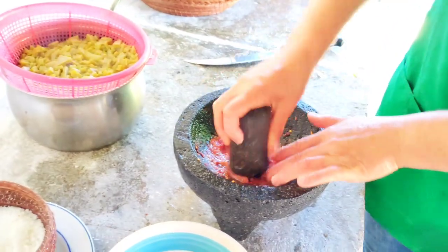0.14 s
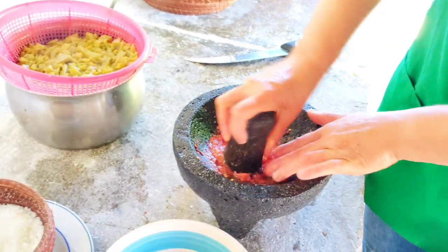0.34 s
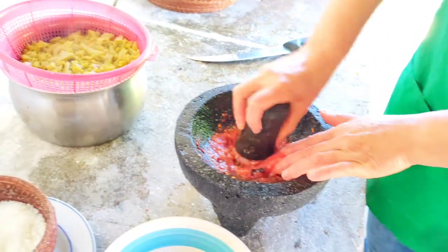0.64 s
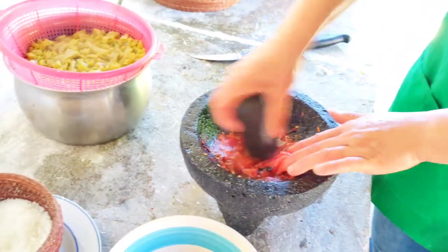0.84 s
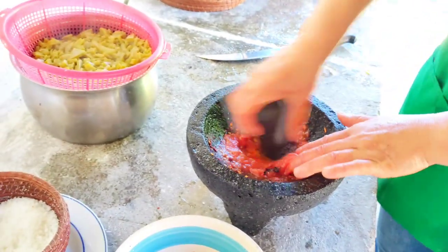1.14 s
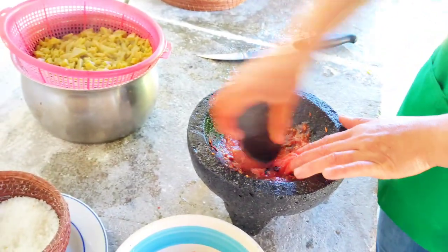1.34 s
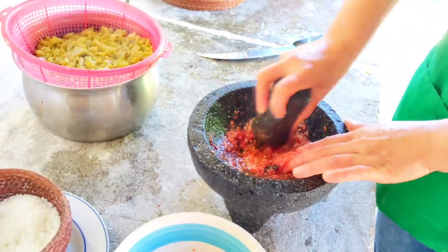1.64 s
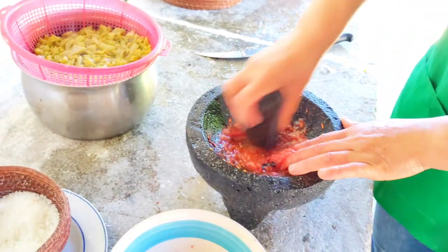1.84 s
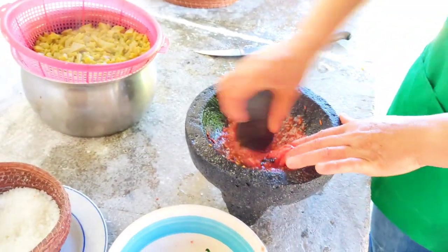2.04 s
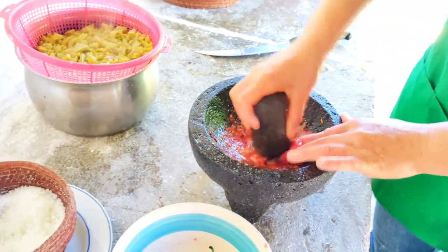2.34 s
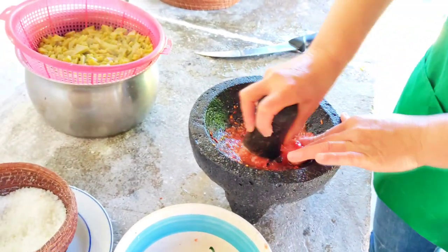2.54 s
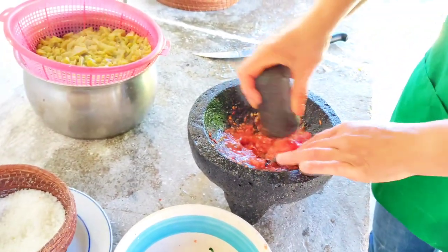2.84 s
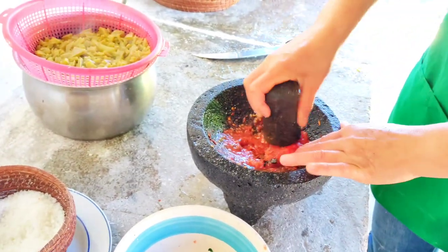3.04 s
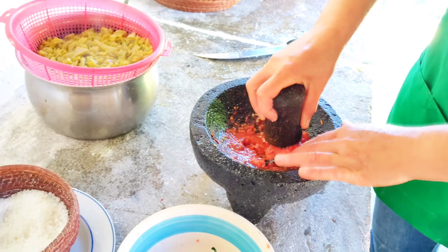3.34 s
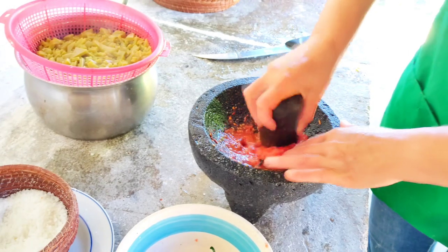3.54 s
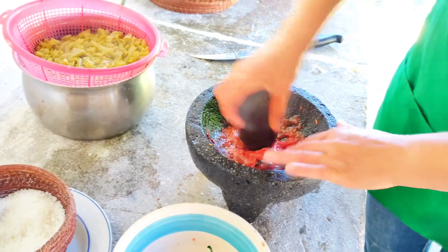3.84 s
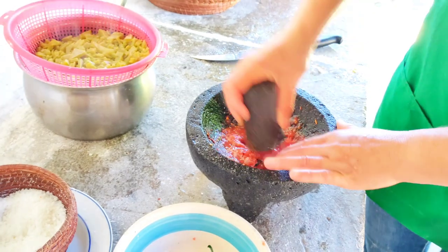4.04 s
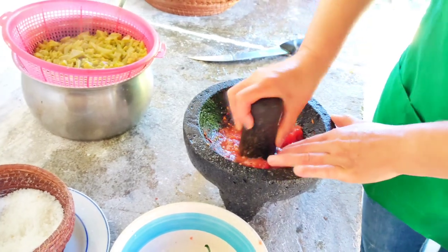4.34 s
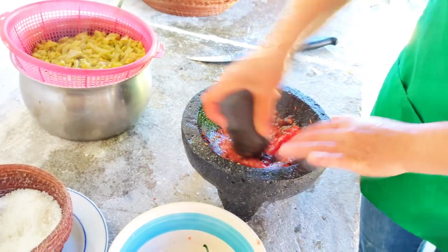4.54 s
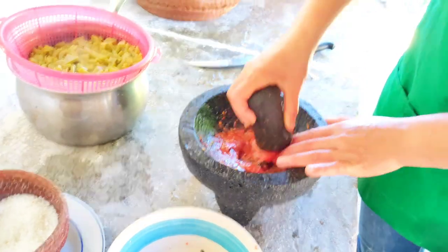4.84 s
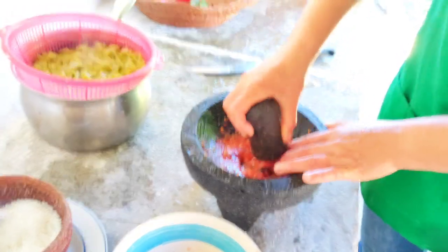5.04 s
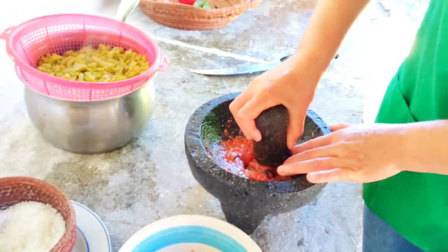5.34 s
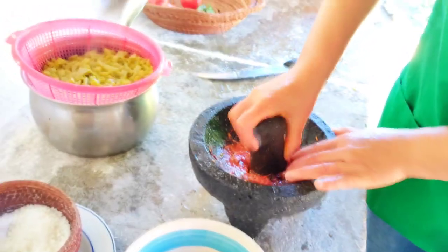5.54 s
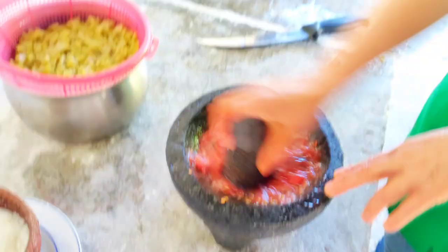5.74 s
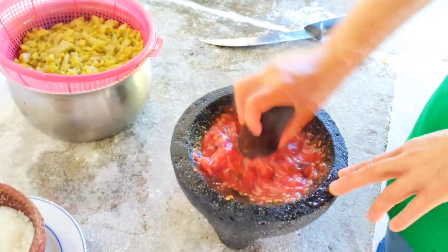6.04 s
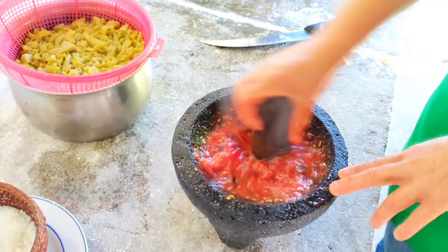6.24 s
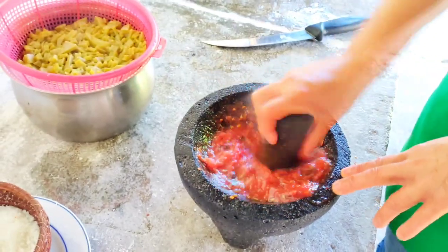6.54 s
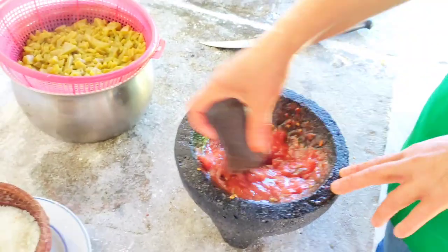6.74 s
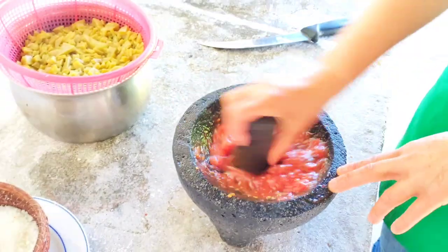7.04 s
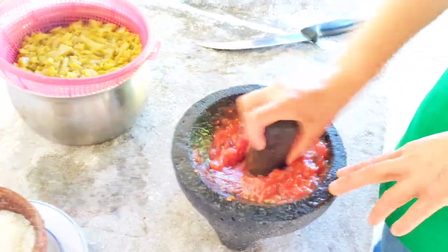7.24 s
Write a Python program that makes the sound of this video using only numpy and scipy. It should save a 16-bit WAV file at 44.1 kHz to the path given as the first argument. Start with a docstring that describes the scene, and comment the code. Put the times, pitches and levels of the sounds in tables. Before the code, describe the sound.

A stone pestle mashes wet tomatoes in a stone mortar in two bouts of thuds, knocks, grating and squirts.

```python
"""A stone pestle mashes tomatoes in a stone mortar, close and in stereo, over quiet open-air ambience.
Soft squelches lead into a first bout (0.7-2.1 s): blows thud through the pulp into the counter, stone
knocks and grates on the rough bowl, skins burst and squirt, and the pulp sucks back with a slurp.
Then the pestle mostly presses and turns, with a wet crackle, stray squirts and the odd knock.
A second bout in thin pulp (5.7-7.4 s) brings the hardest knock, squeaks on bare stone and last squirts."""
import sys
import numpy as np
from scipy import signal
from scipy.io import wavfile

SR = 44100
rng = np.random.default_rng(int(sys.argv[2]) if len(sys.argv) > 2 else 0)


def transcribe(signal):
    """Save signal, clipped to [-1, 1], as a 16-bit WAV file at the path in sys.argv[1]."""
    frames = np.atleast_2d(signal).T
    limited = np.clip(frames, -1, 1)
    pcm = np.round(limited * 32767).astype(np.int16)
    wavfile.write(sys.argv[1], SR, pcm)


N = 325458
TIME = np.arange(N) / SR
RING_TIME = TIME[:SR // 2]

# outdoor bed: f/Hz, spectral level/dB
AIR_COLOUR = [(25, 0), (108, -6), (1100, -16), (1650, -14), (3250, -22.5), (6050, -28), (11300, -34),
              (14800, -25.5)]
# stereo image of the noises: f/Hz, left-right correlation
STEREO_LIKENESS = [(30, 0.4), (100, 0.92), (420, 0.55), (1800, 0.064), (14000, 0.045)]
# decay of the kitchen shelter's reflections: f/Hz, t60/s
SHELTER_DECAY = [(100, 0.28), (3000, 0.26), (14000, 0.019)]
# rumble of the wobbling mortar: f/Hz, spectral level/dB
ROCKING_COLOUR = [(50, -40), (80, -2.5), (108, 0), (140, -4.5), (200, -14.5), (300, -24.5), (1000, -57)]
# bright scatter off the bowl's wall, for splashes and the crack of a knock: f/Hz, spectral level/dB
WALL_COLOUR = [(800, 9.5), (2500, -0.5), (4500, -3.5), (8500, -7.5), (11500, -9), (14500, -2.5)]
# dense upper resonances of the stone: f/Hz, spectral level/dB
STONE_TIMBRE = [(400, 4.5), (620, -4.5), (950, 2), (1450, -6), (1900, -14), (3000, -11.5), (3800, -20),
                (6000, -16), (10000, -22), (14000, -43)]
# modes of the mortar on the counter: f/Hz, level/dB, t60/s
COUNTER_RING = [(108.9, -2, 0.31), (148, -4, 0.1), (172.5, -4, 0.087), (262, -12, 0.12), (344, -6, 0.071),
                (415.4, -7.5, 0.26), (467, -8.5, 0.11), (553, -22.5, 0.12)]
# modes of the stone bowl and the air in it: f/Hz, level/dB, t60/s
BOWL_RING = [(756.6, -21, 0.11), (825, -20.5, 0.078), (907.5, -9, 0.061), (1019, -9, 0.037),
             (1120, -9, 0.035), (1343, -0.5, 0.014), (1603, -5.5, 0.013), (1974, -5.5, 0.0085),
             (2566, -7.5, 0.0078)]
# the bowl's hollow note and the pestle's high ring after a free bounce: f/Hz, level/dB, t60/s
FREE_RING = [(991, -5, .05), (2985, 0, .022)]

# steady mashing, in fresh fruit and then in thin pulp: start/s, end/s, rocking/dB, crackle/dB
MASHING_BOUTS = [(0.694, 2.135, -45.5, -58), (5.732, 7.38, -48.5, -74.5)]
# soft flesh gives way in a swell of crackle: t/s at the crest, level/dB
FLESH_SQUELCHES = [(0.256, -52), (0.487, -50.5), (1.076, -49), (1.227, -44), (1.632, -40), (2.306, -59),
                   (2.709, -55), (2.955, -58), (4.335, -52)]
# skins burst and juice squirts: t/s, level/dB, f/Hz, skin snap against the pops/dB
JUICE_SQUIRTS = [(0.793, -25.5, 6460, -4), (0.8088, -36.5, 8800, 8), (0.9486, -39.5, 5800, 14),
                 (1.003, -45, 6000, 11), (1.036, -41.5, 6600, 11), (1.104, -24, 5500, 0.5),
                 (1.378, -18, 4600, -29), (1.6558, -21, 5900, -2), (1.814, -27.5, 4950, -3.5),
                 (1.9712, -33, 6340, 10.5), (2.069, -24.5, 4120, -10), (2.644, -39.5, 5430, -21),
                 (3.4472, -43, 5070, -8), (3.605, -23.5, 4250, -2), (3.87, -36, 4270, -14),
                 (3.947, -47, 7760, 13), (4.1619, -38, 5800, -16), (4.5654, -32.5, 4450, -25),
                 (5.067, -41, 3700, 2.5), (5.451, -45.5, 5270, -16), (6.975, -32.5, 8400, -7),
                 (7.0097, -27.5, 3900, -8), (7.078, -27, 6700, 8), (7.276, -24, 3900, -11),
                 (7.326, -30.5, 5950, -5)]
# the pestle skids on bare stone: start/s, end/s, level/dB, f/Hz
STONE_SKIDS = [(6.028, 6.125, -56, 3000), (6.152, 6.153, -42.5, 5810), (6.894, 6.954, -57, 3170)]
# the pestle drags over the bowl: start/s, end/s, grating/dB, counter drone/dB
DRAGS = [(1.022, 1.112, -44, -37.5), (1.297, 1.364, -43, -43), (1.519, 1.711, -49.5, -37.5),
         (1.736, 1.83, -41, -33.5), (2.028, 2.119, -35.5, -27), (5.587, 5.651, -48.5, -64),
         (5.699, 5.819, -44, -39.5), (6.058, 6.176, -40.5, -36), (6.227, 6.259, -38, -32),
         (6.349, 6.453, -41.5, -35.5), (6.614, 6.697, -52, -42.5), (6.876, 6.976, -44, -34),
         (7.213, 7.271, -41.5, -37.5), (7.301, 7.414, -41.5, -40.5)]
# the weight of a blow reaches the counter: t/s, level/dB, contact hardness/Hz
COUNTER_THUDS = [(0.634, -27, 190), (0.838, -16, 191), (0.957, -22.5, 186), (1.239, -25, 199),
                 (1.532, -14.5, 605), (1.783, -25, 500), (1.863, -13, 196), (1.922, -14.5, 500),
                 (2.425, -27, 163), (3.619, -13, 248), (4.330, -32, 133), (5.624, -33, 168),
                 (5.788, -23, 128), (5.999, -17.5, 490), (6.872, -19.5, 398), (7.101, -16, 218)]
# the pestle bounces free after the hardest blows: t/s, level/dB
FREE_BOUNCES = [(1.529, -23.5), (6.003, -19.5)]
# stone meets stone: t/s, level/dB, contact hardness/Hz, f/Hz favoured by the struck spot
STONE_KNOCKS = [(0.949, -41, 4000, 1660), (1.319, -36.5, 1190, 1330), (1.528, -13.5, 2050, 830),
                (1.765, -27, 1270, 880), (1.926, -30, 1120, 880), (2.035, -32.5, 1500, 1300),
                (2.410, -41, 4700, 1650), (3.6059, -24.5, 5130, 1560), (3.948, -52, 6000, 1410),
                (5.748, -32, 650, 764), (5.996, -8.5, 2500, 946), (6.146, -26, 1816, 1000),
                (6.228, -34.5, 1300, 1100), (6.308, -32, 1300, 1380), (6.374, -25, 930, 905),
                (6.398, -25, 1010, 950), (6.414, -27, 1210, 1050), (6.528, -35.5, 1300, 1240),
                (6.8675, -18.5, 935, 1130), (6.980, -21, 830, 1120), (7.0956, -22, 930, 1260),
                (7.230, -27, 899, 930)]

BOUT_RISE_S, BOUT_FALL_S = 0.12, 0.019   # time constants of leaning in and letting go


def from_db(db):
    """Decibels to gain."""
    return 10 ** (np.asarray(db) / 20)


def rms_one(x):
    """Scale to rms 1."""
    return x / np.sqrt(np.mean(x ** 2) + 1e-20)


def unit_energy(response):
    """Scale an impulse response so that it passes power unchanged."""
    return rms_one(response) / np.sqrt(response.shape[-1])


def at_hz(points, hz):
    """Read a table on a log-frequency axis."""
    freqs, values = np.array(points).T
    return np.interp(np.log(hz), np.log(freqs), values)


def butter(x, hz, kind, order=2):
    """Causal Butterworth filter."""
    sos = signal.butter(order, np.clip(hz, 10, .45 * SR), kind, fs=SR, output="sos")
    return signal.sosfilt(sos, x + 1e-18)


def resonance(x, hz, width_hz):
    """Two-pole band-pass with gain 1 at its peak."""
    r = np.exp(-np.pi * width_hz / SR)
    feedback = [1, -2 * r * np.cos(2 * np.pi * hz / SR), r * r]
    return signal.lfilter(np.array([1, 0, -1]) * (1 - r * r) / 2, feedback, x + 1e-18)


def add(track, s, sound):
    """Mix a sound into a track at time s."""
    i = int(np.clip(round(s * SR), 0, N - 1))
    track[..., i:i + sound.shape[-1]] += sound[..., :N - i]


def through(force, response):
    """Play a force through a stereo impulse response."""
    return signal.fftconvolve(np.atleast_2d(force), response, axes=-1)[:, :N]


def swell(start, end, rise_s, fall_s):
    """An envelope that grows to 1 at start, holds until end and dies away."""
    return np.exp(np.minimum(TIME - start, 0) / rise_s - np.maximum(TIME - end, 0) / fall_s)


def tail(s, t60):
    """An envelope that jumps to 1 at time s and dies away."""
    return (TIME >= s) * np.exp(-np.log(1000) * np.maximum(TIME - s, 0) / t60)


def together(gains):
    """Joint gain of unrelated causes: their powers add."""
    return np.sqrt(sum(gain ** 2 for gain in gains))


def noise(colour, t, t60=None):
    """Stereo noise in third-octave bands, rms 1 overall; with a t60 table each band dies away."""
    out, edges = 0, np.geomspace(22, 17000, 29)
    white = rng.standard_normal((2, 2, len(t)))
    for k, band in enumerate(zip(edges, edges[1:])):
        hz = np.sqrt(np.prod(band))
        mid, side = butter(white[k % 2], band, "band")
        alike = at_hz(STEREO_LIKENESS, hz)
        stereo = np.sqrt(1 + alike) * mid + np.sqrt(1 - alike) * side * [[1], [-1]]
        fade = from_db(-60 * t / at_hz(t60, hz)) if t60 else 1
        out = out + from_db(at_hz(colour, hz)) * fade * stereo
    return rms_one(out)


def grains(per_s, spread_db, size=N):
    """Random clicks, most near height 1, a few louder (or softer, with a negative spread)."""
    heights = from_db(spread_db * np.minimum(rng.exponential(1, size), 4))
    return (rng.random(size) < per_s / SR) * heights * rng.choice([-1, 1], size)


def modal(modes, polarity=1):
    """A ring of decaying modes, the higher wider in stereo; negative polarity flips every other one."""
    out = 0
    for k, (hz, db, t60) in enumerate(modes):
        skew = np.arctan(hz / 1900) / 2 * np.array([[1], [-1]])
        decay = np.exp(-np.log(1000) * RING_TIME / t60)
        out = out + polarity ** k * from_db(db) * decay * np.sin(2 * np.pi * hz * RING_TIME + skew)
    return out


def contact(hardness_hz, pitch_hz):
    """Force pulse of a blow, shorter when harder, with gain 1 at pitch_hz."""
    age = 2 * np.pi * hardness_hz * RING_TIME[:SR // 20]
    pulse = age * np.exp(-age)
    return pulse / pulse.sum() * (1 + (pitch_hz / hardness_hz) ** 2)


def outdoor_air():
    """A quiet, steady bed of low rumble and hiss."""
    return from_db(-60) * noise(AIR_COLOUR, TIME)


def stone_responses():
    """Impulse responses of bowl, counter and a free bounce: modes, then the shelter's reflections."""
    arrival = 1 - np.exp(-RING_TIME / .004)
    crack = noise(WALL_COLOUR, RING_TIME) * np.exp(-RING_TIME / 0.0011)
    scatter = arrival * noise(STONE_TIMBRE, RING_TIME, SHELTER_DECAY)
    scatter *= from_db(-1.5) * np.exp(-RING_TIME / 0.0021) + from_db(-29.5)   # early burst, faint tail
    bowl = modal(BOWL_RING, polarity=-0.99) + from_db(-2.5) * crack + scatter
    reflections = noise([(60, -8.5), (600, -9.5)], RING_TIME, SHELTER_DECAY)
    boom = arrival * butter(reflections, hz=580, kind="low", order=4)
    counter = from_db(-4) * modal(COUNTER_RING) + from_db(-15) * boom
    ring = modal(FREE_RING)
    echo = unit_energy(arrival * noise(STONE_TIMBRE, RING_TIME, SHELTER_DECAY))
    free_ring = from_db(5) * ring + from_db(-6.5) * through(ring, echo)[:, :len(RING_TIME)]
    return bowl, counter, free_ring


def rocking(idle_db=-56.5, wobble_t60=0.75):
    """The mortar rumbles on the counter while the hand works, and wobbles on after thuds and drags."""
    causes = [from_db(idle_db)]   # the pestle only presses and turns
    causes += [from_db(db) * swell(start, end, BOUT_RISE_S, BOUT_FALL_S)
               for start, end, db, _ in MASHING_BOUTS]
    causes += [from_db(db - 19.5) * tail(s, wobble_t60) for s, db, _ in COUNTER_THUDS]
    causes += [from_db(db - 3) * tail((start + end) / 2, wobble_t60) for start, end, _, db in DRAGS]
    return together(causes) * noise(ROCKING_COLOUR, TIME)


def crackle(idle_db=-67.5):
    """Pulp fizzes under the pestle, swells in bouts and squelches, and settles after each squirt."""
    work = [from_db(idle_db)]
    work += [from_db(db) * swell(start, end, BOUT_RISE_S, BOUT_FALL_S)
             for start, end, _, db in MASHING_BOUTS]
    spurts = [from_db(db) * swell(s, s, rise_s=0.016, fall_s=0.005) for s, db in FLESH_SQUELCHES]
    spurts += [from_db(db - 17.5) * tail(s, t60=0.049) for s, db, _, _ in JUICE_SQUIRTS]
    fizz = rms_one(grains(per_s=2200, spread_db=7))
    steady = rms_one(resonance(fizz, hz=6420, width_hz=7200))
    bright = from_db(5.5) * butter(fizz, hz=3460, kind="high", order=1)
    return together(work) * steady + together(spurts) * bright


def slurp(s=2.122, db=-49.5, top_hz=3600, sag_hz_per_s=25000, spread_hz=990, fall_s=0.032):
    """Pulp sucks back as the pestle leaves it: tiny pops fall in pitch in a widening air pocket."""
    pitch = top_hz - sag_hz_per_s * np.clip(TIME - s, 0, 2 * fall_s)
    pops = 0
    for hz in np.linspace(1500, 4500, num=7):
        sweep = np.exp(-((hz - pitch) / spread_hz) ** 2)
        pops = pops + sweep * resonance(grains(per_s=1800, spread_db=0), hz, width_hz=200)
    return from_db(db) * swell(s, s, rise_s=0.038, fall_s=fall_s) * rms_one(pops)


def squirts(fade_s=0.006, width_hz=1700, trim_db=-22, snap_delay_s=0.0021, snap_fade_s=0.00044):
    """A string of tiny air pockets pops near one pitch, and the skin splits with a bright snap."""
    out, age = np.zeros(N), RING_TIME[:SR // 25]
    tear = np.exp(-age / snap_fade_s)
    for s, db, hz, snap_db in JUICE_SQUIRTS:
        pops = grains(per_s=5000, spread_db=7.5, size=len(age)) * np.exp(-age / fade_s)
        pockets = rms_one(resonance(resonance(pops, hz, width_hz), hz, 2 * width_hz))
        sizzle = from_db(-27) * rms_one(butter(pops, hz=3900, kind="high"))
        snap = rms_one(butter(rng.standard_normal(len(age)) * tear, hz=2820, kind="high", order=1))
        add(out, s, from_db(db + trim_db) * (pockets + sizzle))
        add(out, s + snap_delay_s, from_db(db + trim_db + snap_db) * snap)
    return out


def juice(splash_db=-9, scatter_s=.0028, left_lag_s=.00002):
    """Dry squirts just right of centre; bowl and shelter scatter them with the crackle and slurp."""
    burst_and_tail = np.exp(-RING_TIME / scatter_s) + from_db(-9)
    scatter = unit_energy(noise(WALL_COLOUR, RING_TIME, SHELTER_DECAY) * burst_and_tail)
    pops = squirts()
    left = from_db(-6.5) * np.interp(TIME - left_lag_s, TIME, pops)   # the farther microphone port
    wet = through(from_db(splash_db) * pops + crackle() + slurp(), scatter)
    return np.array([left, pops]) + wet


def skids(edge_s=0.0031, width_hz=120):
    """Fast slips hold the stone in a rough, narrow squeak."""
    out = 0
    for start, end, db, hz in STONE_SKIDS:
        squeak = resonance(resonance(rng.standard_normal(N), hz, width_hz), hz, width_hz)
        out = out + from_db(db) * swell(start, end, edge_s, edge_s) * rms_one(squeak)
    return out


def pressure(start, end, attack_s=0.015, release_s=0.027, sag_db_per_s=26.5):
    """Envelope of one drag: pressure builds, eases as the pestle travels, and lifts."""
    ramps = np.clip((TIME - start) / attack_s, 0, 1) * np.clip((end - TIME) / release_s, 0, 1)
    return ramps * from_db(-sag_db_per_s * np.clip(TIME - start, 0, end - start))


def grating(bowl, counter, slip_db=4, damping_s=0.13):
    """The pestle sticks and slips over the stone's pores: a scrape, a counter growl and bright grit."""
    grate = sum(from_db(db) * pressure(start, end) for start, end, db, _ in DRAGS)
    drone = sum(from_db(db) * pressure(start, end) for start, end, _, db in DRAGS)
    flutter = rms_one(butter(rng.standard_normal(N), hz=(25, 70), kind="band"))
    clumps = from_db(slip_db * np.clip(flutter, -2, 2))
    catches = rms_one(grains(per_s=1200, spread_db=1.7) * clumps)
    friction = catches * grate
    scrape = through(friction, unit_energy(butter(bowl, hz=3200, kind="low", order=1)))
    damped = counter * np.exp(-RING_TIME / damping_s)   # the hand's weight shortens the ring
    growl = through(catches * drone, unit_energy(butter(damped, hz=201, kind="high")))
    grit = resonance(friction, hz=5940, width_hz=520)
    grit += from_db(-5.5) * resonance(friction, hz=13400, width_hz=490)
    grit += from_db(-19) * butter(friction, hz=6000, kind="high")
    return scrape + growl + from_db([[-9], [-2]]) * grit


def thuds(counter):
    """Blows cushioned by pulp shake the counter."""
    force = np.zeros(N)
    for s, db, hardness_hz in COUNTER_THUDS:
        add(force, s, from_db(db) * contact(hardness_hz, pitch_hz=112.3))
    return through(butter(force, hz=82, kind="high", order=5), counter)


def chatter(spray_db=-12.5, fade_s=0.013):
    """One touch, then a dying spray of tiny ones as grit crumbles under the knock."""
    age = RING_TIME[:SR // 12]
    spray = grains(per_s=1400, spread_db=-3, size=len(age)) * np.exp(-age / fade_s)
    return (age == 0) + from_db(spray_db) * spray


def knocks(bowl, free_ring, rebound_s=.0045, rebound_db=4):
    """Gritty hits ring the bowl, each spot in its own colour; after the hardest the pestle bounces."""
    on_bowl, bounces = np.zeros((2, N))
    for s, db, hardness_hz, spot_hz in STONE_KNOCKS:
        force = from_db(db) * signal.fftconvolve(chatter(), contact(hardness_hz, pitch_hz=926))
        add(on_bowl, s, force + resonance(force, spot_hz, width_hz=175))
    for s, db in FREE_BOUNCES:   # the bowl's hollow and the pestle ring, and the pestle lands again
        add(bounces, s, from_db(db) * chatter())
        add(on_bowl, s + rebound_s, from_db(db + rebound_db) * contact(hardness_hz=2560, pitch_hz=970))
    return through(on_bowl, bowl) + through(butter(bounces, hz=3900, kind="low", order=4), free_ring)


def scene():
    """Mortar, counter and pulp over the outdoor bed."""
    bowl, counter, free_ring = stone_responses()
    mortar = knocks(bowl, free_ring) + thuds(counter) + grating(bowl, counter) + skids() + rocking()
    return mortar + juice() + outdoor_air()


def record(dry):
    """Each microphone port rings at its own treble pitch; peaks are rounded, deep bass and top are cut."""
    ceiling, cutoff_hz = .6, 15600
    left, right = butter(dry, hz=39.3, kind="high", order=3)
    left = left + from_db(-8.5) * resonance(left, hz=8500, width_hz=3000)
    right = right + from_db(1.5) * resonance(right, hz=5750, width_hz=2440)
    rounded = ceiling * np.tanh(np.array([left, right]) / ceiling)
    return signal.sosfilt(signal.ellip(10, .2, 80, cutoff_hz, fs=SR, output="sos"), rounded)


dry = scene()
out = record(dry)
transcribe(out)
```